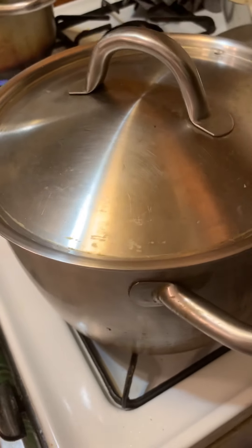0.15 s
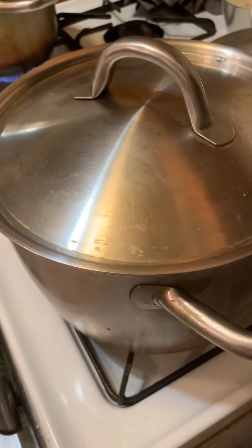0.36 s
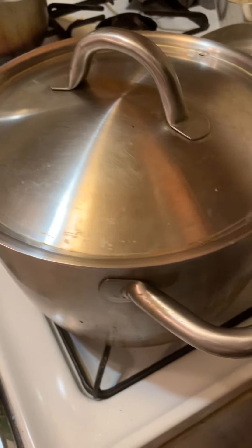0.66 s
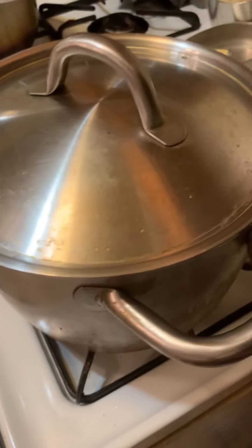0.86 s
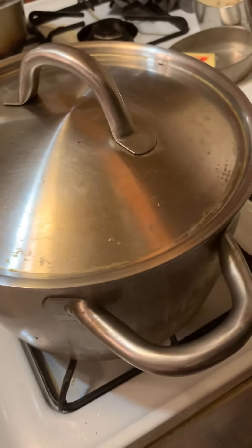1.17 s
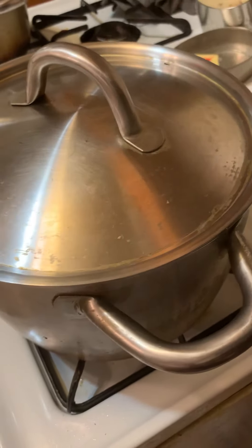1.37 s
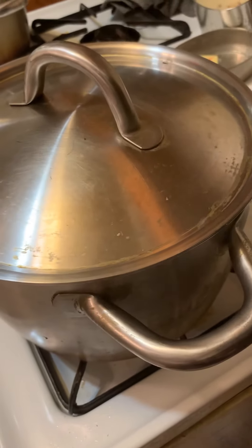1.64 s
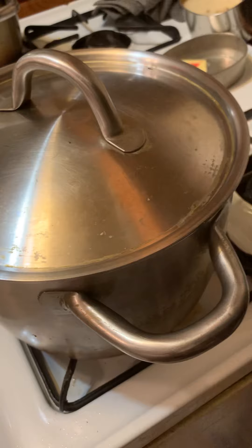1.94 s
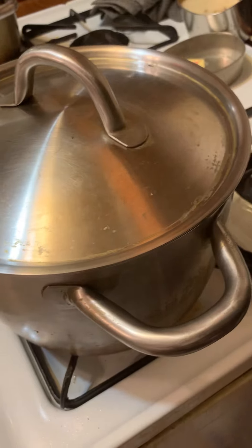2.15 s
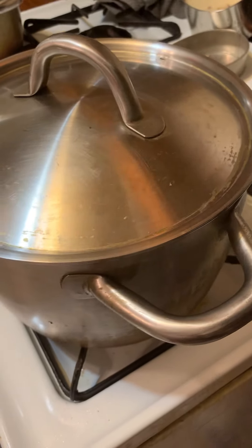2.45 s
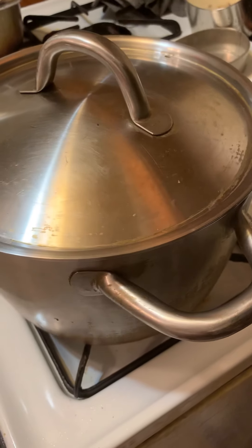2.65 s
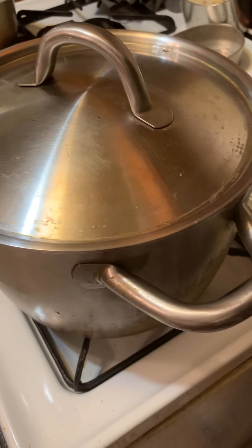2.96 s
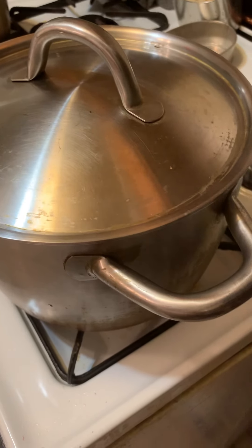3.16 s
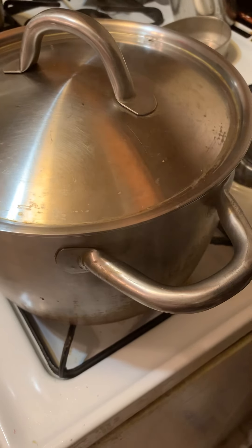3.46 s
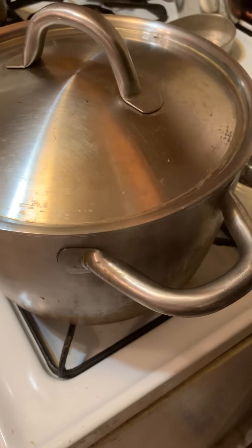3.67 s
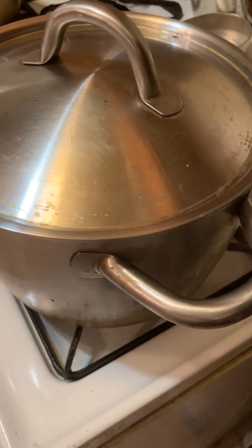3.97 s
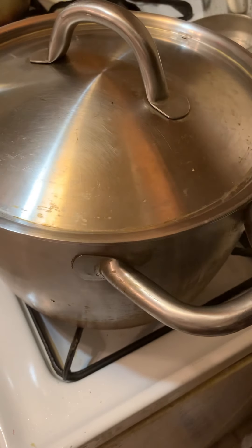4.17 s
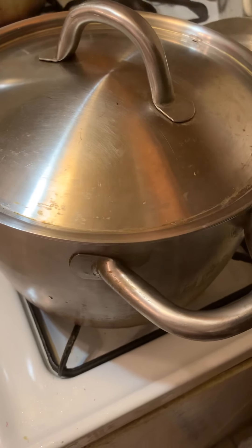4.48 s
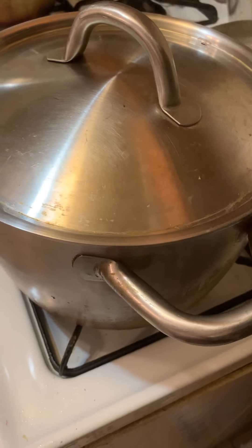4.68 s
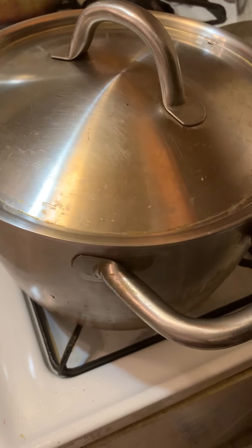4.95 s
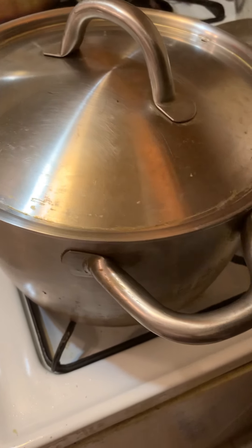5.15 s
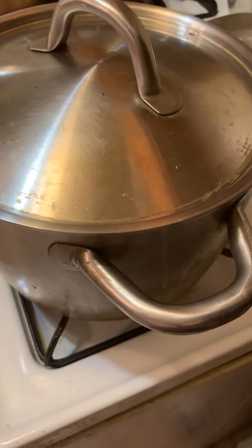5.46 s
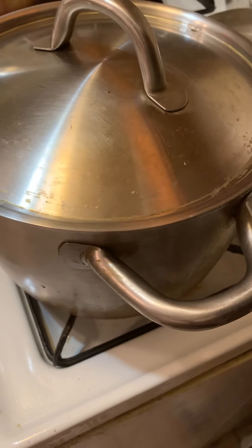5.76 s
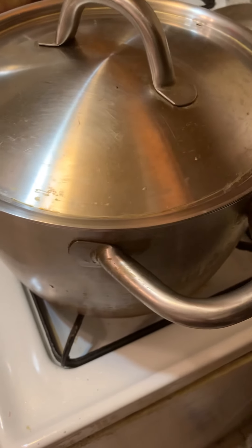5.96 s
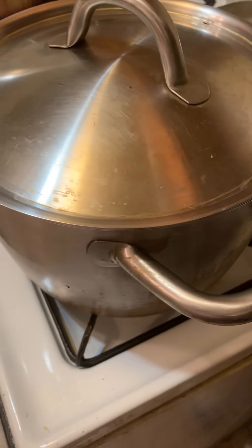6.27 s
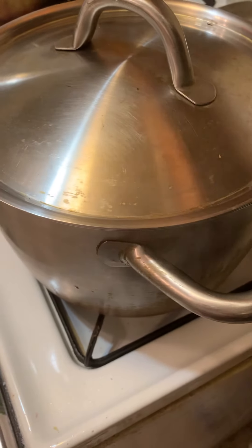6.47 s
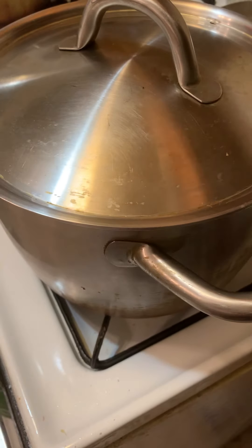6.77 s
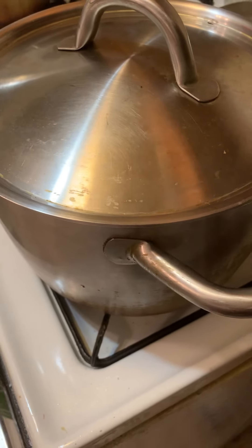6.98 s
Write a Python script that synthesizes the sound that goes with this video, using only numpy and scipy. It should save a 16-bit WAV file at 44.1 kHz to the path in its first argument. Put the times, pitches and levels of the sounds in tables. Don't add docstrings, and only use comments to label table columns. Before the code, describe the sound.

Throughout about seven seconds, a gas burner hisses broad and soft, weighted to the low and middle range, flickering slightly and sinking a little after 3 s. Beneath it sit a steady mains hum and a low wavering fan drone, its deepest tone strongest around 2 to 4.5 s; faint muffled bubble ticks come from inside a covered pot. At 0.6 s there is a slight scrape and tap, then at 0.86 s a loud woody knock, a tight cluster of thuds with crockery scraping and a short clear bowl ring, and another thud at 1.1 s. Small dish ticks follow at 1.43 s. Two softer, dull wooden knocks fall close together at 4.86 s. At 5.31 s a pan lands with a sharp, bright metallic clank, rim chatter and a low worktop thud, quickly choked. Only hiss and hum remain. Close stereo phone pickup, small dry kitchen.

```python
import sys
import numpy as np
from scipy import signal
from scipy.fft import rfft, irfft, next_fast_len
from scipy.io import wavfile
from scipy.ndimage import uniform_filter1d

SR = 44100
rng = np.random.default_rng(int(sys.argv[2]) if len(sys.argv) > 2 else 0)


def gain_from_db(level_db):
    decades = np.asarray(level_db, float) / 20
    return 10 ** decades


def wav_record(signal):
    frames = np.transpose(np.atleast_2d(signal))
    bounded = np.clip(frames, -1, 1)
    quanta = np.round(bounded * 32767).astype(np.int16)
    wavfile.write(sys.argv[1], SR, quanta)


N = 313992
TIME = np.arange(N) / SR

# (frequency [Hz], spectrum level [dB])
HISS_SPECTRUM = [(30, -1), (55, 9), (95, 11.5), (165, 3.5), (245, 12), (320, 4.5), (400, 8), (620, 1.5),
                 (900, 6.5), (2200, 3), (4000, 3), (6500, -1), (8500, 0), (15500, -10)]
# (time [s], hiss level [dB])
GAS_FLOW = [
    (0.0, -42),
    (0.42, -43.5),
    (0.89, -42.5),
    (3.13, -44.5),
    (3.47, -44),
    (5.47, -43.5),
    (5.65, -45),
    (6.76, -43.5),
    (7.12, -43.5),
]
# (frequency [Hz], lag [turns], left-right likeness [0-1], left minus right [dB])
PORT_DIFFERENCE = [(0, 0, 1, .3), (250, 0, .98, 3), (500, 0, .75, 2.2), (900, -.1, .2, 1.0),
                   (2100, .11, .38, 0), (4700, .5, .86, 0), (6500, .92, .94, 0), (17000, 3.41, .93, 0)]
# (time [s], shaft line level [dB])
FAN_LOAD = [
    (0.0, -65),
    (0.06, -54),
    (1.15, -57),
    (2.08, -46.5),
    (4.34, -48),
    (4.54, -60),
    (4.58, -51),
    (5.29, -57),
    (7.06, -54),
    (7.12, -54),
]
# (multiple of blade rate [-], level [dB], left minus right [dB])
BLADE_PARTIALS = [(1, -51, 2.0), (2, -57, 3.0), (3, -58, 3.0), (4, -57, 5.0), (5, -65, 3.0), (6, -66, 4.0)]
# (frequency [Hz],
# level [dB], left minus right [dB])
EXTRA_FAN_LINES = [(94.4, -63.5, -2.5), (396, -58, 6)]
# (time [s], level [dB], contact [ms], rub [ms])
CROCKERY_SCRAPES = [
    (.585, -37, 0.48, 18),
    (.868, -37, 0.077, 50),
    (.945, -44, 0.096, 7.7),
    (1.045, -38, 0.061, 27),
    (1.428, -34, 0.07, 11),
    (1.437, -48, 0.066, 5.4),
    (1.478, -44, 0.12, 17),
]
# (frequency [Hz], level [dB], decay t60 [s])
CROCKERY_MODES = [(800, -4, .012), (1250, 0, .015), (1620, 0, .022), (2000, -1, .012), (2700, 1, .006),
                  (3600, 1, .004), (6000, -8, .003)]
# (time [s], level [dB], contact [ms], rub [ms])
CUPBOARD_KNOCKS = [(.59, -36.5, 0.51, 4.7), (.861, -12.5, 0.48, 16), (.868, -11, 0.53, 8.3),
                   (.875, -11.5, 1.7, 7.5), (.922, -26, 1.2, 9), (.933, -19.5, 1.23, 9.6),
                   (.958, -20.5, 1.36, 9.9), (1.015, -34, 3.2, 7.1), (1.086, -21.5, 1.25, 12),
                   (1.098, -12.5, 2.6, 3), (1.432, -31.5, 0.41, 5.4), (1.443, -35, 1.04, 7.1),
                   (4.855, -29, 1.8, 4.7), (4.885, -23, 2.4, 10)]
# (frequency [Hz], level [dB], decay t60 [s])
CUPBOARD_MODES = [(122.6, -27, .08), (187, -10.5, 0.17), (235.5, -1, 0.096), (277, 2, 0.036),
                  (343, 3, 0.04), (416, -12, 0.18), (520, -9.5, 0.092), (620, -5.5, 0.04), (745, -22, .044)]
# (time [s], level [dB], contact [ms], rub [ms])
BOWL_JOLTS = [
    (.866, -18.5, 0.36, 2.7),
]
# (frequency [Hz], level [dB], decay t60 [s])
BOWL_MODES = [(856, -2.5, .62), (1552, -3, .25), (1310, -13, .12), (1776, -12, .15), (5800, 11, .06)]
# (time [s], level [dB], contact [ms], rub [ms])
RIM_SCRAPES = [
    (5.304, -37, .04, 3.3),
    (5.308, -43, 0.069, 3.5),
    (5.312, -16, 0.041, 1.7),
    (5.316, -17, 0.16, 1.4),
    (5.323, -39, 0.37, 5.5),
    (5.332, -32, 0.16, 3),
    (5.345, -24.5, 0.092, 26),
]
# (frequency [Hz], level [dB], decay t60 [s])
RIM_MODES = [(540, -8.5, 0.0042), (1660, 1.5, 0.0025), (2800, 4.5, .003), (3720, 0.5, 0.0068),
             (6260, -5.5, 0.0028), (11400, -11, 0.0019)]
# (time [s], level [dB], contact [ms], rub [ms])
PAN_BLOWS = [
    (5.309, -21.5, 0.031, 3.0),
    (5.315, -13.5, 0.11, 4.1),
    (5.338, -28, 0.023, 2.2),
]
# (frequency [Hz], level [dB], decay t60 [s])
PAN_MODES = [(958, -15, .04), (1351, -8.5, .12), (1405, -14, .06), (1642, -18, .05), (2143, -11, .08),
             (2196, -1.5, .12), (2255, -7, .07), (2321, -4, .13), (2805, -11, .1), (2988, -11, .08),
             (3445, -14, .05), (3709, -8, .06), (3830, -4, .07), (5770, -12, .04)]
# (time [s], level [dB], contact [ms], rub [ms])
WORKTOP_THUDS = [
    (5.315, -32, 0.89, 5.0),
    (5.332, -20, 2.1, 9),
]
# (frequency [Hz], level [dB], decay t60 [s])
WORKTOP_MODES = [(109, -2, 0.12), (269, -14, .25), (347, -8, 0.17), (414, -2.5, 0.17)]


def walk(rate):
    k = int(SR / rate)
    held = np.repeat(rng.standard_normal(N // k + 1), k)
    return 1.23 * uniform_filter1d(uniform_filter1d(held, k), k)[:N]


def ports(x, pan_db, lag_ms):
    late = np.interp(TIME - lag_ms / 1000, TIME, x)
    return np.array([x * gain_from_db(pan_db / 2), late * gain_from_db(-pan_db / 2)])


def flame():
    size = next_fast_len(N)
    hz = np.maximum(np.arange(size // 2 + 1) * SR / size, 1)
    at, db = np.transpose(HISS_SPECTRUM)
    db = np.interp(np.log(hz), np.log(at), db)
    at, *columns = np.transpose(PORT_DIFFERENCE)
    lag, like, pan_db = (np.interp(hz, at, c) for c in columns)
    near, other = rfft(rng.standard_normal((2, size)))
    far = (like * near + np.sqrt(1 - like ** 2) * other) * np.exp(-2j * np.pi * lag)
    pair = np.array([near * gain_from_db(db + pan_db / 2), far * gain_from_db(db - pan_db / 2)]) * (hz > 22)

    s, flow = np.transpose(GAS_FLOW)
    low_db = np.interp(TIME, s, flow - flow.mean())
    high_db = 0.42 * low_db + 0.6 * walk(3.105)
    out = 0
    for octave in np.arange(4.5, 15, .75):
        distance = np.clip((np.log2(hz) - octave) / .75, -1, 1)
        band = irfft(pair * np.cos(np.pi / 2 * distance) ** 2, size)[:, :N]
        flow_db = low_db if octave < 12 else high_db
        flicker_db = .8 * walk(8)
        out = out + band * gain_from_db(flow_db * min(octave / 10, 1) + flicker_db)
    return out * gain_from_db(-41)


def simmer():
    when, pitch, loud = rng.random((900, 3)).T
    t = np.arange(2048) / SR
    hz = (1100 * (4000 / 1100) ** pitch)[:, None]
    size = gain_from_db(-57 - 2.5 * np.log(1 - loud))[:, None]
    glide = 1 + .001 * hz * t
    ping = size * np.sin(2 * np.pi * hz * t * glide) * np.exp(-t * hz / 14)
    out = np.zeros(N + 2048)
    np.add.at(out, (when * N).astype(int)[:, None] + np.arange(2048), ping)
    return ports(out[:N], 0.3, .1)


def fan():
    shaft_hz, blades, mains_hum_hz = 45.55, 3, 120.0
    s, shaft_db = np.transpose(FAN_LOAD)
    shaft_db = np.interp(TIME, s, shaft_db)
    lightness = np.clip((shaft_db.max() - shaft_db) / 6, .3, 1.5)
    shaft_db = shaft_db + 3.5 * walk(9) * lightness
    turn = 2 * np.pi * np.cumsum(shaft_hz * (1 + 0.00328 * walk(6))) / SR
    out = ports(gain_from_db(shaft_db) * np.sin(turn), 0.1, 0)

    hum = gain_from_db(-42.5 + 0.64 * walk(9.9))
    out += ports(hum * np.sin(2 * np.pi * mains_hum_hz * TIME), 1.2, 0)
    for k, db, pan_db in BLADE_PARTIALS:
        partial = gain_from_db(db + 2.4 * walk(10)) * np.sin(round(k) * blades * turn + 1.27 * walk(15))
        out += ports(partial, pan_db, 0)
    for hz, db, pan_db in EXTRA_FAN_LINES:
        tone = gain_from_db(db + 4.8 * walk(8)) * np.sin(2 * np.pi * hz * TIME + 1.03 * walk(12))
        out += ports(tone, pan_db, 0)
    return np.sqrt(2) * out


def blows(table, rub_db):
    force = np.zeros(N)
    after = np.arange(2048) / SR * 1000
    jolts = rng.standard_normal((len(table), 2048))
    for (s, db, contact_ms, rub_ms), jolt in zip(table, jolts):
        push = after * np.exp(-after * 2 / contact_ms)
        rub = gain_from_db(rub_db) * jolt * np.exp(-after / rub_ms) / np.sqrt(rub_ms)
        rub[0] += 1
        start = int(s * SR)
        force[start:start + 2048] += gain_from_db(db) * signal.fftconvolve(rub, push / push.sum())[:2048]
    return force


def ring(force, modes, travel_ms=0.):
    out, busy = np.zeros(N), np.flatnonzero(abs(force) > 1e-9)
    span = slice(busy[0], busy[-1] + SR // 2)
    for k, (hz, db, t60) in enumerate(modes):
        pole = np.exp(2j * np.pi * hz / SR - np.log(1000) / (t60 * SR))
        late = np.roll(force[span], int(travel_ms * (300 / hz) ** 2 * SR / 1000))
        out[span] += (-1) ** k * gain_from_db(db) * signal.lfilter([1], [1, -pole], late).imag
    return out


def room(x, wet_db, t60, bright_hz):
    t = np.arange(int(.6 * SR)) / SR
    shared, apart = rng.standard_normal((2, len(t)))
    apart = signal.lfilter(*signal.butter(2, 600, "high", fs=SR), apart)
    tail = shared + np.array([[1], [-1]]) * apart
    tail = tail * 1000. ** (-t / t60) * np.clip(t / 0.017, 0, 1)
    tail = signal.lfilter(*signal.butter(1, bright_hz, fs=SR), tail)
    return gain_from_db(wet_db) * signal.fftconvolve(x[None], tail / np.sqrt((tail ** 2).sum() / 2))[:, :N]


def crockery():
    return ring(blows(CROCKERY_SCRAPES, rub_db=-4.5), CROCKERY_MODES)


def cupboard():
    return ring(blows(CUPBOARD_KNOCKS, rub_db=-15.5), CUPBOARD_MODES, travel_ms=2.82)


def bowl():
    return ring(blows(BOWL_JOLTS, rub_db=-40), BOWL_MODES)


def pan_rim():
    return ring(blows(RIM_SCRAPES, rub_db=-3.5), RIM_MODES)


def pan():
    choke_db = -8 * np.clip((TIME - 5.37) / .03, 0, 1)
    return ring(blows(PAN_BLOWS, rub_db=-30), PAN_MODES) * gain_from_db(choke_db)


def worktop():
    return ring(blows(WORKTOP_THUDS, rub_db=-9.0), WORKTOP_MODES)


def scene():
    bed = flame() + simmer() + fan()
    dishes, bowl_ring, crack, pan_ring = crockery(), bowl(), pan_rim(), pan()
    wood = signal.lfilter(*signal.butter(2, 90, "high", fs=SR), cupboard() + worktop())
    direct = ports(dishes, 1.5, .09) + ports(wood, 2.6, .05) + ports(bowl_ring, 2.0, .19)
    direct += ports(pan_ring + crack, -0.2, .105)
    rings = gain_from_db(-12) * (pan_ring + bowl_ring)
    wet = room(wood, -14.5, 0.3, 3000) + room(dishes + crack + rings, -5.5, 0.079, 3800)
    return direct + wet + bed


def band_limit(x):
    return signal.sosfilt(signal.butter(12, 16650, fs=SR, output="sos"), x)


def record(dry):
    return band_limit(dry)


dry = scene()
out = record(dry)
wav_record(out)
```